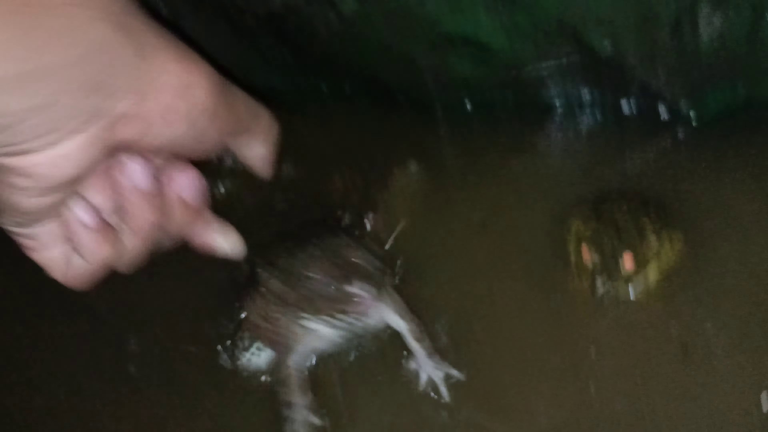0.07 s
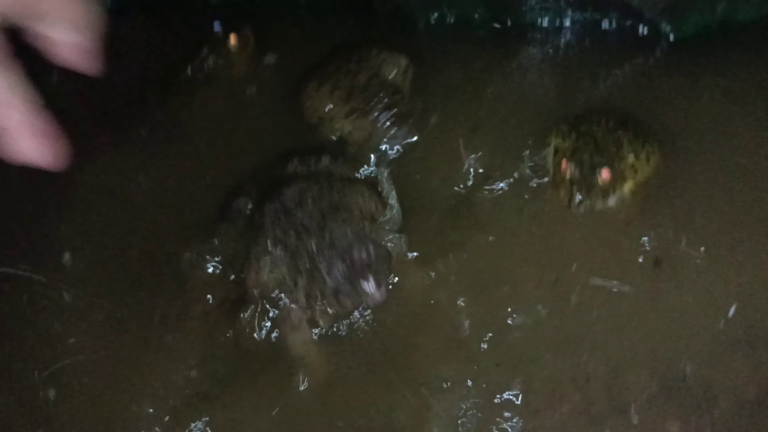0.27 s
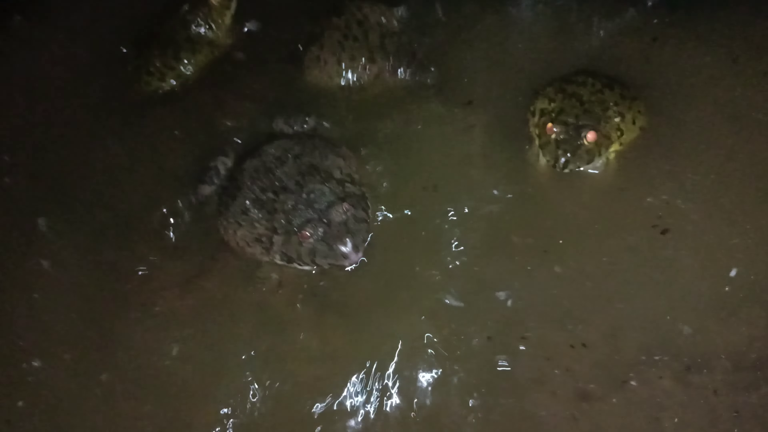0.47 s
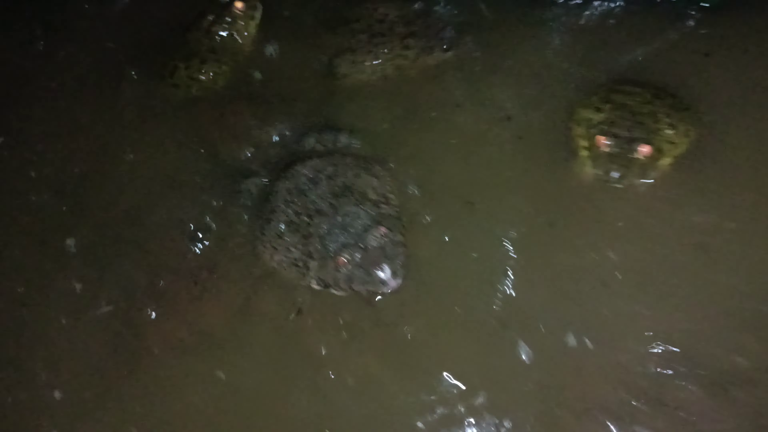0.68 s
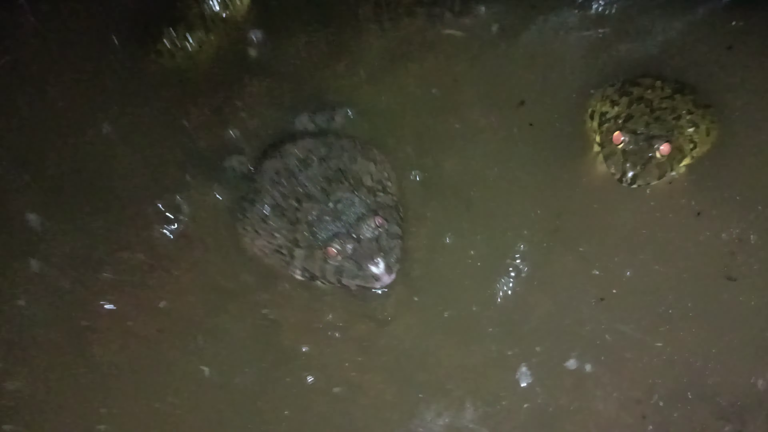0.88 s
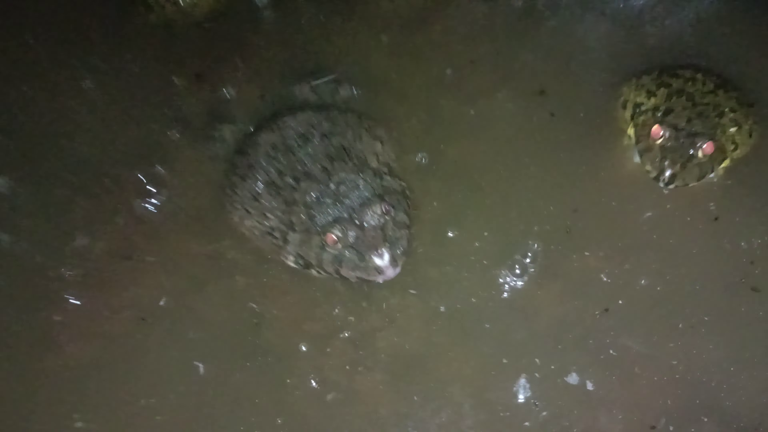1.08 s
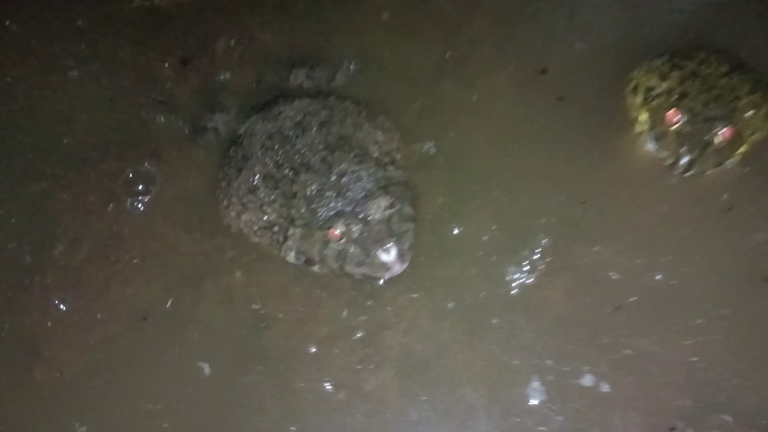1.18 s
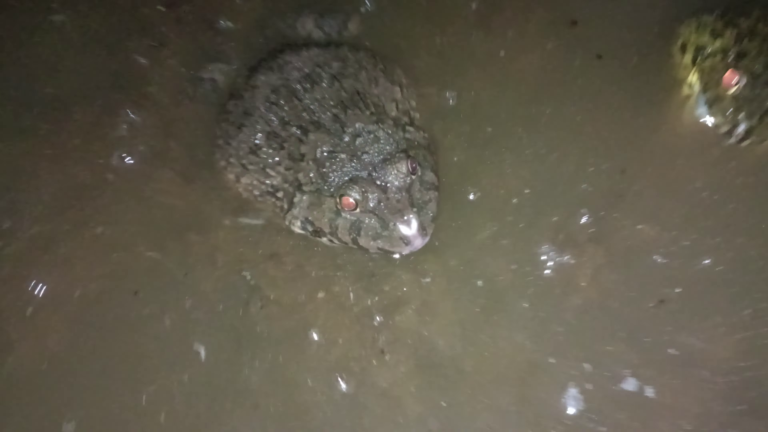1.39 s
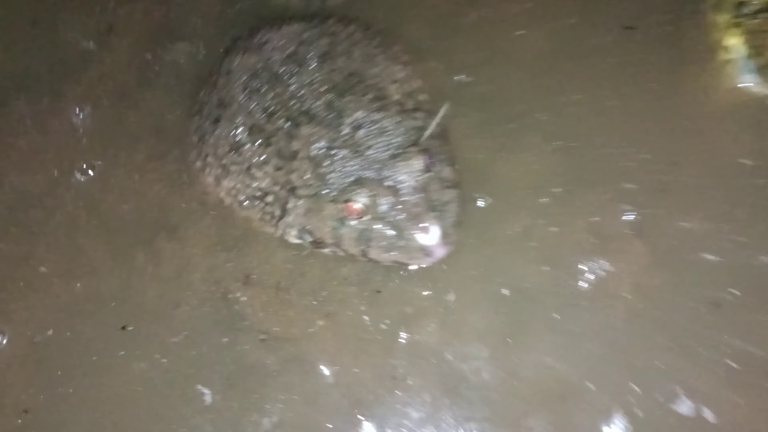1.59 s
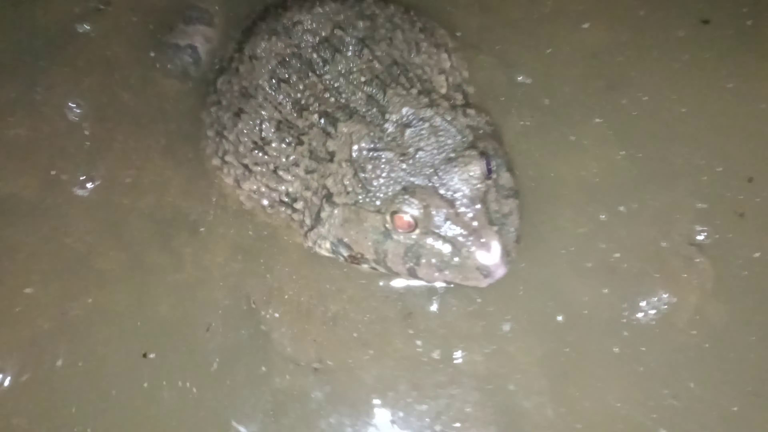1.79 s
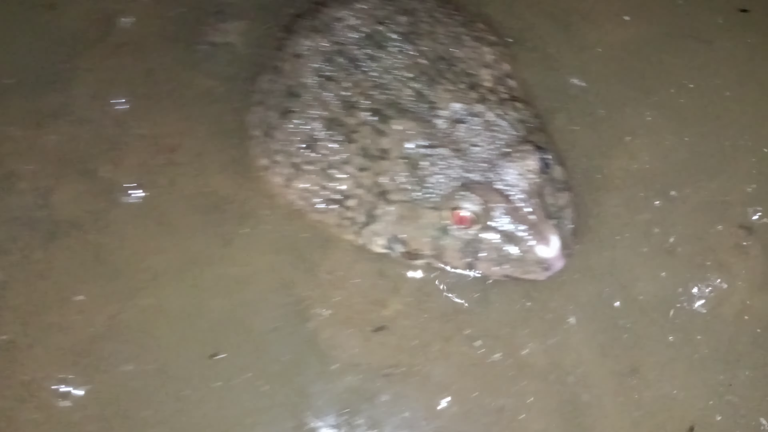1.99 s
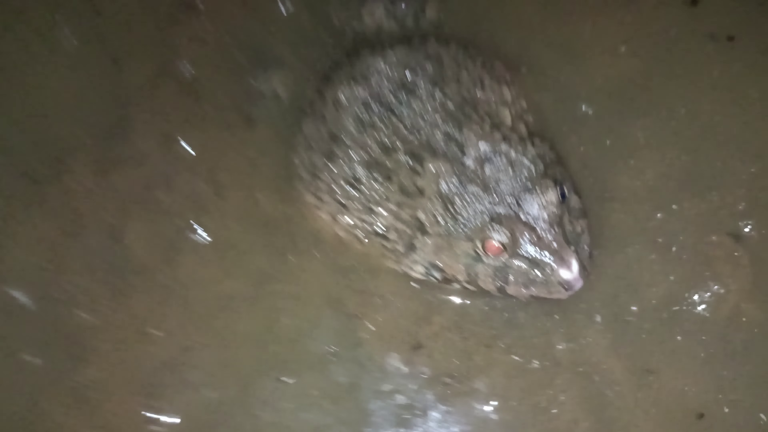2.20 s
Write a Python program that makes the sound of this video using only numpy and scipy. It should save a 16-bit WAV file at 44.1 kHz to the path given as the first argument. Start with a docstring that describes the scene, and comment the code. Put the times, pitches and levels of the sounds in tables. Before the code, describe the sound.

One short splash comes right at the start as a frog lands in a shallow outdoor pool, trailing bubbles and drops. Then soft rubbing and a final tap sound on the moving microphone, with distant night insects throughout.

```python
"""Night at a walled pool: two kinds of distant insect chirp throughout, and a hand-held camera rustles.
At 0.2 s a frog is dropped into shallow water. The slap throws a burst of spray, trapped air rings
as bubbles and the displaced water closes with dull knocks; the walls return short echoes.
From about 1 s the camera moves closer, with louder rubbing, a creak, soft bumps and a faint hum.
Near 2 s a finger taps its left microphone port."""
import sys
import numpy as np
from scipy import signal
from scipy.fft import rfft, irfft, next_fast_len
from scipy.io import wavfile
from scipy.ndimage import map_coordinates

SR = 44100
rng = np.random.default_rng(int(sys.argv[2]) if len(sys.argv) > 2 else 0)


def inscribe(sig):
    """Save sig as 16-bit PCM at rate SR to the path in sys.argv[1].

    A 1-D sig is mono; a 2-D sig holds one channel per row.
    Samples are clipped to [-1, 1] before scaling.
    """
    pcm = np.round(np.clip(np.atleast_2d(sig).T, -1, 1) * 32767)
    wavfile.write(sys.argv[1], SR, pcm.astype(np.int16))


N = 99225
TIME = np.arange(N) / SR


def amp(db):
    """Decibels to amplitude gain."""
    return 10 ** (np.asarray(db) / 20)


def unit(x):
    """Scaled to rms 1."""
    return x / np.sqrt(np.mean(x ** 2) + 1e-20)


def along(points, hz):
    """Interpolation of (Hz, value) points on a log frequency axis."""
    f, value = np.transpose(points)
    return np.interp(np.log(hz + 1), np.log(f + 1), value)


def level(rows):
    """Gain per sample from (s, dB) points, silent outside them."""
    return amp(np.interp(TIME, *np.transpose(rows), left=-np.inf, right=-np.inf))


def sides(pan_db):
    """Channel gains for a pan, the left level minus the right."""
    return amp(np.array([[.5], [-.5]]) * pan_db)


def wobble(rate):
    """A smooth random curve, rate knots a second."""
    return map_coordinates(rng.standard_normal(int(N * rate / SR) + 4), [TIME * rate])


def filtered(x, response):
    """Linear filtering by a frequency response."""
    size = next_fast_len(N + SR // 2)
    return irfft(rfft(x, size) * response(np.fft.rfftfreq(size, 1 / SR)), size)[..., :N]


def burst(start, rise, t60, hold=0):
    """A quick rise, a hold and an exponential decay."""
    t = np.maximum(TIME - start, 0)
    return (1 - np.exp(-t / rise)) * np.exp(-np.log(1000) * np.maximum(t - hold, 0) / t60)


# Likeness of the channels. Each row: frequency in Hz, correlation.
COHERENCE = [(60, 0.99), (200, 0.94), (600, 0.86), (2000, 0.017), (6000, 0.034)]
def noise(response):
    """Partly coherent stereo noise of rms 1: alike in the bass, unrelated in the treble."""
    def mid_and_side(f):
        angle = np.arccos(np.clip(along(COHERENCE, f), -1, 1)) / 2
        return response(f) * [np.cos(angle), np.sin(angle)]
    mid, side = filtered(rng.standard_normal((2, N)), mid_and_side)
    return unit(np.array([mid + side, mid - side]))


def band(hz, width_hz):
    """Noise in one steep resonance."""
    return noise(lambda f: 1 / (1 + ((f * f - hz * hz) / (f * width_hz + 1)) ** 2))


def sliding(rows, width_hz, ratio=1):
    """Frequency shifting makes a noise band follow (s, dB, Hz) points, at ratio times their pitch."""
    times, db, hz = np.transpose(rows)
    centre = ratio * hz.mean()
    shift_cycles = np.cumsum(ratio * np.interp(TIME, times, hz) - centre) / SR
    shifted = signal.hilbert(band(centre, width_hz)) * np.exp(2j * np.pi * shift_cycles)
    return level(np.transpose([times, db])) * shifted.real


# Outdoor background. Each row: frequency in Hz, relative spectral density in dB.
NIGHT_SPECTRUM = [(20, -3), (55, 3.5), (90, -1.5), (175, -1), (280, -10), (486, -9), (850, -20.5),
                  (1390, -22.5), (1900, -14), (2970, -6), (3900, -16.5), (4900, -3), (6100, -12), (7120, 3),
                  (8200, -11), (9800, -21), (11700, -10), (14600, -15), (15800, -27)]
# Its balance. Each row: frequency in Hz, pan in dB.
NIGHT_BALANCE = [(1800, -0.5), (2700, -5), (7800, -1.5), (9500, 4), (12000, -3.5)]
def night():
    """Ambient noise: a broad spectrum whose level wavers slightly."""
    gain = amp(-45.5 + 1.8 * wobble(9.99))
    return gain * noise(lambda f: amp(along(NIGHT_SPECTRUM, f)) * sides(along(NIGHT_BALANCE, f)))


# The slower insect's calls. Each row: start in seconds, length in seconds, level in dB.
INSECT_CHIRPS = [(-.02, .11, -45), (0.203, 0.11, -46.5), (0.427, 0.13, -46), (0.655, 0.12, -44),
                 (.889, 0.13, -45), (1.106, 0.13, -45.5), (1.334, 0.13, -44.5), (1.54, 0.12, -46.5),
                 (1.758, 0.13, -44.5), (1.99, 0.14, -42), (2.23, .11, -43)]
PULSE_PERIOD_S = .0998  # the faster insect
def insects():
    """Amplitude modulation: each kind switches a narrow band of rasp on and off."""
    def gate(start, length, edge):
        return .5 + .5 * np.tanh((length / 2 - np.abs(TIME - start - length / 2)) / edge)
    def rasp(hz, width_hz, pan_db):
        return sides(pan_db) * unit(band(hz, width_hz) * amp(1.5 * wobble(140)))
    chirps = sum(amp(db) * gate(start, length, edge=0.012) for start, length, db in INSECT_CHIRPS)
    pulse_starts = np.arange(0.069, N / SR, PULSE_PERIOD_S)
    pulses = amp(-44.5) * sum(gate(start, length=0.052, edge=0.011) for start in pulse_starts)
    return chirps * rasp(4956, width_hz=680, pan_db=5) + pulses * rasp(7590, width_hz=880, pan_db=-4)


# Balance of the rubbing. Each row: frequency in Hz, pan in dB.
FRICTION_BALANCE = [(300, -11.5), (1000, 1), (2800, 2), (6000, 1.5), (7600, 6), (9500, 0), (12500, 2.5)]
def friction(spectrum):
    """Sliding contact makes broadband noise, here with the given spectrum."""
    return noise(lambda f: amp(along(spectrum, f)) * sides(along(FRICTION_BALANCE, f)))


# Rubbing as the camera moves. Each row: time in seconds, level in dB.
RUSTLE_LEVELS = [(0, -41), (.05, -47), (.17, -55), (.4, -51), (.6, -52.5), (.72, -49), (.85, -53),
                 (.96, -41), (1.01, -42.5), (1.03, -32), (1.06, -40), (1.15, -44), (1.28, -43),
                 (1.46, -45.5), (1.56, -41), (1.7, -42.5), (1.87, -40), (2, -43), (2.3, -45)]
# Its colour. Each row: frequency in Hz, relative spectral density in dB.
RUSTLE_SPECTRUM = [(150, -20), (500, 1), (900, -4.5), (1400, -1.5), (1750, 0), (2300, 8.5), (3050, 7),
                   (3900, 1.5), (5500, 6), (7500, 0.5), (9800, -0.5), (13000, 1.5), (15500, -9.5)]
def rustle():
    """Friction of hand and sleeve, fluttering in level."""
    flutter = amp(1.6 * wobble(50.31) + 0.95 * wobble(700))
    return level(RUSTLE_LEVELS) * flutter * friction(RUSTLE_SPECTRUM)


# Scuffs, then thin bright ticks. Each row: start in seconds, level in dB, T60 in seconds.
SCUFF_EVENTS = [(.002, -36.5, 0.057), (.953, -38, .06), (1.009, -36, 0.042), (1.022, -32, 0.063),
                (1.028, -34, 0.028), (1.171, -34.5, 0.045), (1.212, -34.5, 0.05), (1.234, -37, 0.061),
                (1.277, -33, 0.052), (1.321, -35, 0.046), (1.365, -36.5, 0.066), (1.386, -36, 0.046)]
TICK_EVENTS = [(.002, -32, 0.072), (.556, -36.5, 0.038), (.678, -35.5, 0.049), (1.872, -30, 0.044)]
# Their colours. Each row: frequency in Hz, relative spectral density in dB.
SCUFF_SPECTRUM = [(150, -1.5), (600, 6), (1500, 5.5), (2700, 11), (3900, -2), (6000, 2), (9800, -3.5),
                  (13000, 0.5), (15500, -29)]
TICK_SPECTRUM = [(2000, -10), (5000, 7.5), (9000, 3), (13000, 4), (15800, -24)]
def catches(events, spectrum):
    """Friction transients: each catch in the rubbing is a decaying burst of grainy noise."""
    envelope = sum(amp(db) * burst(start, 0.00047, t60) for start, db, t60 in events)
    return envelope * unit(friction(spectrum) * amp(1.8 * wobble(900)))


# Hand bumps. Each row: peak time in seconds, level in dB, Gaussian width in seconds, pitch in Hz.
HAND_BUMPS = [(0.007, -45, 0.039, 58), (0.675, -49, 0.022, 135), (0.734, -50, 0.028, 72),
              (0.992, -48, 0.011, 83), (1.028, -47, .012, 205), (1.06, -38, 0.018, 62),
              (1.122, -50, 0.022, 40), (1.412, -48, 0.022, 105)]
def bumps():
    """Soft impacts: slow contact puts the energy in a low band."""
    return sum(amp(db) * np.exp(-.5 * ((TIME - peak) / width) ** 2) * band(hz, 0.7 * hz)
               for peak, db, width, hz in HAND_BUMPS)


# Falling drops. Each row: start in seconds, level in dB.
DROP_IMPACTS = [(0.039, -34), (.3095, -35), (.343, -29), (0.3479, -27), (.459, -35)]
# Their colour. Each row: frequency in Hz, relative spectral density in dB.
DROP_SPECTRUM = [(700, -28), (1900, -10), (2750, 9), (4000, -10), (6200, -3), (9500, -17), (15800, -17)]
def drips():
    """Impact noise: single drops tick on the surface."""
    envelope = sum(amp(db) * burst(start, 0.00034, t60=0.048) for start, db in DROP_IMPACTS)
    return envelope * noise(lambda f: amp(along(DROP_SPECTRUM, f)) * (f > 700))


# Air bubbles. Each row: start in seconds, pitch in Hz, level in dB, T60 in seconds,
# fraction of pitch gained per T60, pan in dB.
AIR_BUBBLES = [(0.2037, 2810, -17.5, 0.025, 0.17, 8), (0.2067, 1690, -29, 0.015, -0.014, 2),
               (.237, 3540, -21.5, 0.012, 0, 7.5), (0.239, 1810, -38, 0.1, -0.08, 12),
               (0.2547, 2700, -23, 0.016, -0.1, 10), (0.2548, 1895, -12, 0.022, -0.0047, 7),
               (0.26, 1280, -26, .028, -0.45, 14), (0.2623, 2560, -23.5, 0.044, 0.12, 3),
               (0.2661, 1920, -26.5, .016, -0.0074, 8), (0.2712, 2754, -20, 0.017, 0.2, 14),
               (0.273, 1840, -29, 0.014, -0.057, 6), (.273, 2290, -23.5, 0.066, 0.038, 7),
               (0.3113, 2930, -30, 0.012, -0.04, 9), (0.3108, 1590, -35, 0.012, -0.11, 8),
               (0.3436, 2945, -14.5, 0.006, 0.047, 11.5), (0.3454, 1700, -23.5, 0.0043, 0.038, 9),
               (0.3461, 3070, -14, 0.007, -0.017, 8), (0.3507, 3120, -22, 0.019, 0.03, 12),
               (.459, 2600, -34, .014, .05, 9)]
def bubbles(hold_cycles=4.4):
    """Bubble resonance: trapped air rings briefly, its pitch sliding as the bubble moves."""
    out = np.zeros((2, N))
    for start, hz, db, t60, glide, pan in AIR_BUBBLES:
        t = np.maximum(TIME - start, 0)
        cycles = hz * t * (1 + glide * t / t60 / 2)
        envelope = amp(db) * burst(start, 0.0011, t60, hold=hold_cycles / hz)
        out += sides(pan) * envelope * np.sin(2 * np.pi * cycles)
    return out


# Water torn by the frog's body and legs, and falling spray.
# Each row: start in seconds, level in dB, T60 in seconds, pan in dB.
WATER_SLAPS = [(0.204, -19, 0.076, 6.5), (0.2083, -26, 0.12, -8), (0.2255, -26.5, 0.07, 3),
               (0.2283, -22.5, 0.047, -5), (0.2376, -26, 0.055, 1), (0.265, -37, .06, 0),
               (.272, -31, 0.08, -3)]
# The spray's colour. Each row: frequency in Hz, relative spectral density in dB.
SPRAY_SPECTRUM = [(800, -37), (1500, -28), (2300, -5), (3100, 1), (3800, -4), (6100, 4.5), (7600, -0.5),
                  (10000, -2), (12700, 1.5), (14300, -1), (15800, -9.5)]
def spray():
    """Superposition: the tiny droplets thrown by each slap merge into a dense crackle."""
    envelope = sum(amp(db) * sides(pan) * burst(start, 0.00025, t60)
                   for start, db, t60, pan in WATER_SLAPS)
    hiss = noise(lambda f: amp(along(SPRAY_SPECTRUM, f)) * (f > 700))
    return envelope * unit(hiss * amp(2.2 * wobble(1100)))


# Bubble swarms where the water closes. Each row: start in seconds, mean delay in seconds,
# level per bubble in dB, middle pitch in Hz, pitch spread in octaves.
BUBBLE_SWARMS = [(0.205, 0.0072, -30, 2560, 0.52), (0.255, .013, -27.5, 2250, 0.36),
                 (0.381, 0.056, -42.5, 2790, 0.16)]
def gurgle(count=40, t60_cycles=13):
    """Damped oscillation of many small random bubbles, their rate thinning exponentially."""
    out, t = np.zeros(N), np.arange(SR // 25) / SR
    for start, delay, db, hz, octaves in BUBBLE_SWARMS:
        scatter = rng.standard_normal((count, 2))
        quantiles = (np.arange(count) + rng.random(count)) / (count + 1)
        onsets = ((start - delay * np.log(1 - quantiles)) * SR).astype(int)
        for onset, (pitch, loudness) in zip(onsets, scatter):
            cycles = hz * 2 ** (octaves * np.clip(pitch, -2, 2)) * t
            envelope = (1 - np.exp(-cycles)) * np.exp(-np.log(1000) * cycles / t60_cycles)
            out[onset:onset + len(t)] += amp(db + 2 * loudness) * envelope * np.sin(2 * np.pi * cycles)
    return sides(pan_db=17.5) * out


# Echoes off the pool walls. Each row: delay in seconds, gain in dB.
WALL_ECHOES = [(.0023, -23), (.0085, -24), (0.0162, -22)]
def pool(x, tail_t60=0.12, tail_db=-12.5):
    """Reflection: near walls add a few echoes and a short reverberant tail."""
    t = np.arange(SR // 3) / SR
    envelope = np.exp(-np.log(1000) * t / tail_t60) * (1 - np.exp(-t / 0.0025))
    tail = rng.standard_normal((2, len(t))) * envelope
    tail = amp(tail_db) * tail / np.linalg.norm(tail[0])
    echoes = filtered(x, lambda f: sum(amp(db) * np.exp(-2j * np.pi * f * s) for s, db in WALL_ECHOES))
    return x + echoes + signal.fftconvolve(x, tail, axes=1)[:, :N]


# The microphone ports' colouring of the splash. Each row: frequency in Hz, pan in dB.
PORT_BALANCE = [(300, -12), (1200, -14.5), (1900, -2.5), (2800, 1.5), (3900, 5), (6000, 0.5), (8000, -6),
                (12500, 11), (15000, 0)]
def ports(x, right_lead_s=.0001):
    """Level and arrival-time differences between the two ports."""
    delays = np.array([[.5], [-.5]]) * right_lead_s
    return filtered(x, lambda f: sides(along(PORT_BALANCE, f)) * np.exp(-2j * np.pi * f * delays))


# Knocks of the water. Each row: start in seconds, level in dB.
SLOSH_KNOCKS = [(0.208, -47), (0.241, -48), (.271, -44), (0.291, -42.5), (.298, -46), (.32, -41),
                (0.345, -40.5)]
# Their colour. Each row: frequency in Hz, relative spectral density in dB.
SLOSH_SPECTRUM = [(100, -18), (200, -0.5), (400, -2.5), (550, -2), (800, -16), (2000, -64)]
def slosh():
    """Cavity collapse: displaced water closes with dull knocks."""
    envelope = sum(amp(db) * burst(start, 0.0011, t60=0.05) for start, db in SLOSH_KNOCKS)
    return envelope * noise(lambda f: amp(along(SLOSH_SPECTRUM, f)))


# A short creak. Each row: time in seconds, level in dB, pitch in Hz.
CREAK_PATH = [(.93, -63, 600), (.96, -48.5, 545), (1.01, -50, 515), (1.028, -40, 465), (1.045, -50, 455),
              (1.08, -58, 470)]
def creak():
    """A low resonance sinks in pitch under the rubbing."""
    return sliding(CREAK_PATH, width_hz=110)


# Ringing in the rubbing. Each row: time in seconds, level in dB, upper pitch in Hz.
RING_PATH = [(1.2, -55, 2606), (1.42, -52, 2750), (1.6, -53, 3002), (1.9, -52, 3222), (2.25, -60, 3101)]
def rub_ring():
    """Friction excites two rising resonances about an octave apart."""
    return sliding(RING_PATH, width_hz=190) + amp(-6.5) * sliding(RING_PATH, width_hz=190, ratio=.47)


# A faint low hum. Each row: time in seconds, level in dB.
HUM_LEVELS = [(1.3, -72.5), (1.55, -58), (1.75, -58), (1.9, -67), (2, -53.5), (2.25, -76)]
def hum():
    """Narrowband noise is heard as a wavering tone."""
    return level(HUM_LEVELS) * band(214.5, width_hz=20)


def tap(start=1.9756, ring_hz=486, push_s=0.000079):
    """Impulse response: a finger's push on the left port leaves a heavily damped ring."""
    t = TIME - start
    push = amp(-7) * np.exp(-.5 * (t / push_s - 1) ** 2)
    ring = amp(-15) * burst(start, .0001, t60=0.01) * np.cos(2 * np.pi * ring_hz * t)
    bandpass = lambda f: 1j * f / (1j * f + 250) / (1 + (f / 3100) ** 10)
    return np.array([[-1], [0]]) * filtered(push + ring, bandpass)


def scene():
    """Superposition of the night, the splash and the moving camera."""
    splash = ports(pool(spray() + bubbles() + gurgle() + drips())) + slosh()
    background = insects() + night()
    rubbing = rustle() + catches(SCUFF_EVENTS, SCUFF_SPECTRUM) + catches(TICK_EVENTS, TICK_SPECTRUM)
    return background + splash + rubbing + bumps() + creak() + rub_ring() + hum() + tap()


def record(dry, top_hz=15800):
    """Band limiting: the camera keeps nothing above top_hz."""
    return filtered(dry, lambda hz: hz < top_hz)


dry = scene()
out = record(dry)
inscribe(out)
```